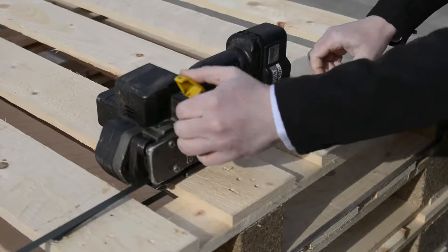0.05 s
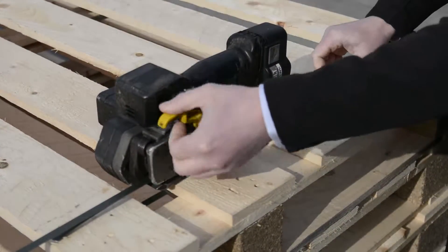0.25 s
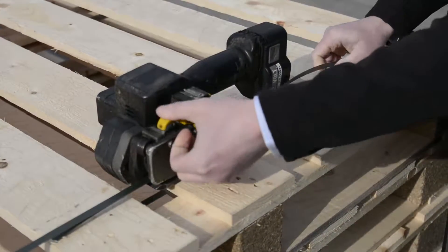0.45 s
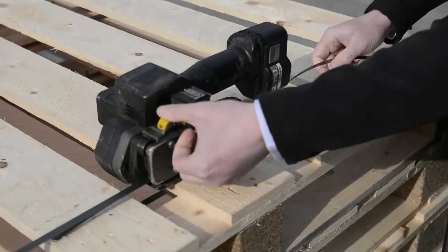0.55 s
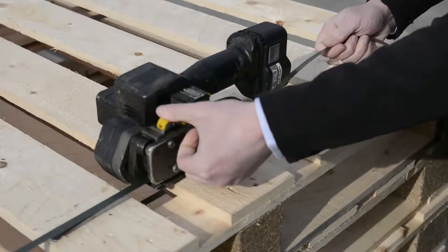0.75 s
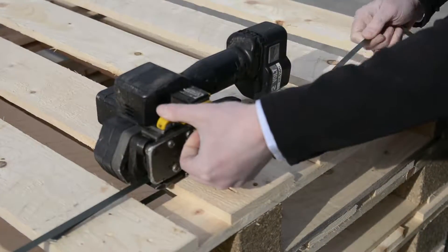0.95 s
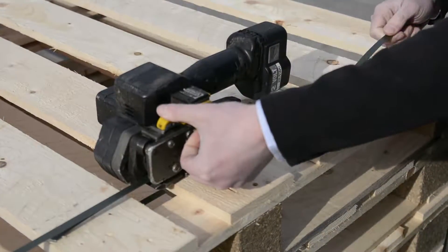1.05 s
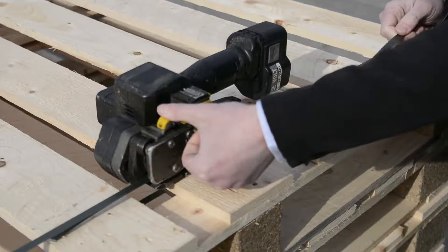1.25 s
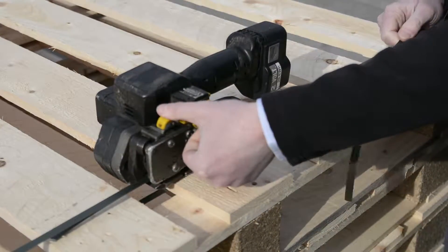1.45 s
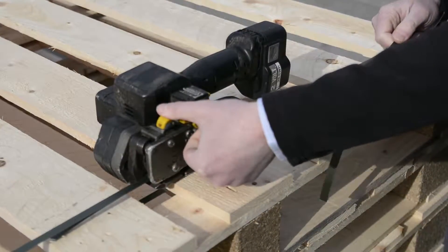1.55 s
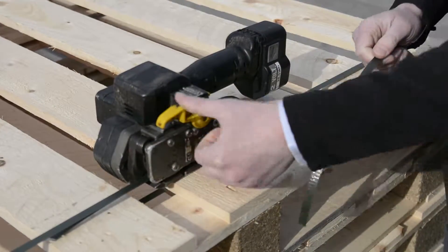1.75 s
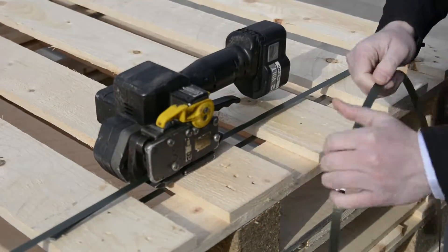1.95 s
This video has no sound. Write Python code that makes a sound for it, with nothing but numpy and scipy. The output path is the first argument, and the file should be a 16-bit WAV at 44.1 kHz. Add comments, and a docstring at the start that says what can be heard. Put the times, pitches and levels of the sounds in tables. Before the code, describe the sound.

A battery strapping tool clicks, spins up and buzzes harshly, welding a plastic strap on a wooden pallet. The buzz eases slightly, then winds down with clicks. It is heard close, outdoors, over a faint distant wash.

```python
"""A battery strapping tool friction-welds a plastic strap on a wooden pallet, outdoors in a yard,
close in front of a narrowly spaced pair of microphones. Its motor spins up and shakes a toothed shoe
that knocks at both ends of each stroke and rasps on the strap; the boards hum underneath. The buzz
eases as the plastic softens, then the motor brakes with a groan. The lever clicks faintly before
and after, over a distant outdoor wash."""
import sys
import numpy as np
from scipy import signal
from scipy.fft import rfft, irfft
from scipy.io import wavfile

SR = 44100
rng = np.random.default_rng(int(sys.argv[2]) if len(sys.argv) > 2 else 0)


def unload_wav(signal):
    """Save mono or channel-first audio to the path in sys.argv[1] as 16-bit WAV at rate SR, clipped to [-1, 1]."""
    wavfile.write(
        sys.argv[1],
        SR,
        np.round(np.clip(np.atleast_2d(signal).T, -1, 1) * 32767).astype(np.int16),
    )


N = 88200

# spectrum of the distant wash (frequency [Hz], relative level [dB])
WASH_SPECTRUM = [(15, -70.5), (25, -34.5), (48, -17), (129, -8.5), (289, -5.5), (331, -13.5), (421, -5.5),
                 (666, -6.5), (848, -4), (1620, -8.5), (2630, -18), (3930, -24), (15500, -35)]
# faint steady tones in the wash (start [s], frequency [Hz], level [dB])
WASH_TONES = [(0, 878, -60.5), (1.9, 1680, -53.5)]
# lever, drive and strap clicks (time [s], knock level [dB], knock pitch [Hz], snap level [dB])
CLICK_EVENTS = [(.0313, -41, 2370, -40.5), (.038, -46, 2600, -63), (.1644, -48, 2010, -71),
                (.1884, -72, 4080, -42), (.2162, -18.5, 1838, -40), (1.3227, -16, 1530, -44),
                (1.3396, -20, 1450, -52), (1.558, -42.5, 3040, -59), (1.5605, -35, 1700, -72),
                (1.9444, -59, 1674, -56)]
# speed of the drive, one turn to each back-and-forth of the shoe (time [s], speed [turns/s])
SHOE_SPEED = [(.213, 32), (.24, 70), (.27, 109), (.3, 136.7), (.336, 149), (.37, 154.9), (.428, 156.8),
              (.478, 162.4), (.528, 165.3), (.632, 167.3), (.72, 167.6), (.804, 166.7), (.912, 164.4),
              (1.1, 163.5), (1.255, 162.8), (1.272, 130), (1.316, 66), (1.356, 27)]
# force on the shoe (time [s], knock level [dB], rasp level [dB], groan level [dB])
SHOE_FORCE = [(.213, -40, -19, -29), (.232, -21, -26.5, -14), (.25, -21.5, -12, -14.5), (.3, -14, -11, -13),
              (.45, -29.5, -10.5, -23.5), (.52, -24.5, -16.5, -31), (.62, -33, -18, -37),
              (.8, -33, -19, -34), (.98, -30.5, -20, -48), (1.15, -33.5, -19, -36.5),
              (1.255, -32, -20, -29.5), (1.285, -29, -22.5, -21.5), (1.32, -28, -24.5, -21.5),
              (1.355, -34, -56, -29)]
# spectrum of the knocks (frequency [Hz], relative level [dB])
KNOCK_SPECTRUM = [(40, -38.5), (300, -35.5), (700, 1), (1000, -6), (1400, -13), (2300, 6.5), (3500, -7.5),
                  (5000, -10.5), (9000, -2.5), (15500, -14)]
# ringing of the housing (frequency [Hz], relative level [dB], t60 [s])
HOUSING_MODES = [(1421, -1, .03), (1549, -6.5, 0.069), (1748, 3.5, 0.024), (2065, -5.5, 0.035),
                 (2462, -12.5, 0.02), (2565, -3.5, 0.027), (3036, -5, 0.031), (3514, -9, 0.027)]
# spectrum of the teeth on the strap (frequency [Hz], relative level [dB])
RASP_SPECTRUM = [(60, -43), (400, -27.5), (1000, -9), (2200, -0.5), (3800, 3.5), (5000, -1.5), (6100, 0.5),
                 (6800, 3.5), (7800, 0), (8900, 5), (9400, -1), (10000, 2.5), (10800, -3), (11600, 2),
                 (12350, -3.5), (13200, 4.5), (14200, -4), (15700, -4.5)]
# swell of the pitched buzz (time [s], level [dB])
BUZZ_LEVEL = [(.23, -47), (.31, -15), (.43, -10.5), (.55, -15.5), (.7, -19.5), (.85, -17.5), (.98, -18.5),
              (1.1, -16.5), (1.24, -15.5), (1.275, -25), (1.33, -51.5)]
# balance of its harmonics in each state of the strap (harmonic [n], cold [dB], soft [dB], molten [dB])
BUZZ_HARMONICS = [(1, -23, -26.5, -25.5), (2, -27, -36.5, -38.5), (3, -12, -24, -27), (4, -9, -30.5, -21),
                  (5, -1, -13, -7), (6, -21.5, -33, -25.5), (7, -4, -15.5, -18), (8, -4, -27, -23.5),
                  (9, -12.5, -9.5, -15.5), (10, -4, -19, -3.5), (11, 1.5, -18, -3.5), (12, 0.5, -8, -20.5),
                  (13, -3, -3, -2), (14, -1, -12, -14), (15, 5.5, -5.5, 0.5), (16, -10.5, -4, -9.5),
                  (17, 0.5, -20.5, -6), (18, -2.5, -11.5, -29.5), (19, -1.5, -18, -10.5), (20, -6, -4, -5),
                  (21, -18.5, -14.5, -7), (22, -1.5, -7, -9), (23, -6.5, -21.5, -28), (24, -15, -14, -22.5),
                  (25, -24, -26, -13.5)]
# difference between the microphones for the close tool (frequency [Hz], side to mid [dB])
TOOL_WIDTH = [(60, -21.5), (450, -21), (800, -47.5), (2000, -59.5), (3300, -42), (5500, -30.5), (9000, -25),
              (14000, -10.5)]
# difference between the microphones for the distant wash (frequency [Hz], side to mid [dB])
WASH_WIDTH = [(130, -28), (1400, -14.5), (7000, 2)]
# reverberation of the yard (frequency [Hz], t60 [s])
YARD_DECAY = [(150, 1), (1000, .6), (3000, 0.82), (8000, .46), (15000, 0.23)]

START_S, STOP_S = .2128, 1.359
SOFTEN_SPAN_S, MELT_SPAN_S = (.44, .495), (.82, .98)
KNOCK_FALL_S, SNAP_FALL_S, CLICK_Q = .0036, .0015, 6.25
RETURN_TURNS, RETURN_DB, STROKE_SPREAD_DB, JITTER_S = .52, 1, 1, .0001
CHATTER_S, CHATTER_DB, RING_DB = .0013, -11, -5.5
GROAN_HOLD, GROAN_FALL_S = .35, .006
RASP_HOLD, RASP_FALL_S, GRIT_SPREAD_DB, TEETH_DB, TEETH_PER_TURN = .43, .0077, .5, -6.5, 14
PALLET_HZ, PALLET_WIDTH_HZ, PALLET_DB = 157, 5, -44
BUZZ_WAVER, BUZZ_LAG_TURNS = .06, .027
WASH_DB, YARD_DB, FIRST_ECHOES_S, SCATTER_S = -50, -24.5, .13, .004
TIME = np.arange(N) / SR


def amp(db):
    """Decibels to gain."""
    return 10 ** (np.asarray(db) / 20)


def unit(x):
    """Scales to rms 1."""
    return x / np.sqrt(np.mean(x ** 2) + 1e-20)


def curve(rows, column=1):
    """One column of a time table, at every sample."""
    rows = np.array(rows)
    return np.interp(TIME, rows[:, 0], rows[:, column])


def read(points, hz):
    """Reads a table on a log-frequency axis."""
    table_hz, value = np.transpose(points)
    return np.interp(np.log(hz + 1), np.log(table_hz), value)


def causal(db):
    """Complex gains of a causal body with these levels, from 0 Hz up."""
    log_gain = np.log(amp(np.r_[db, db[-2:0:-1]]))
    return np.exp(np.conj(signal.hilbert(log_gain)))[:len(db)]


def colour(x, spectrum):
    """Filters through a body with this spectrum, at about equal power."""
    taps = irfft(causal(read(spectrum, np.fft.rfftfreq(4096, 1 / SR))))
    return signal.fftconvolve(x, taps / np.linalg.norm(taps))[:N]


def waver(rate_hz):
    """Random drift of rms 1, mostly slower than the given rate."""
    hz = np.fft.rfftfreq(N, 1 / SR)
    return unit(irfft(rfft(rng.standard_normal(N)) / (1 + (hz / rate_hz) ** 4), N))


def fade(x, fall_s):
    """Gives every impulse an exponential tail."""
    return signal.lfilter([1], [1, -np.exp(-1 / (fall_s * SR))], x)


def crossings(turns):
    """Samples at which a new turn begins."""
    return np.flatnonzero(np.diff(np.ceil(turns)) > 0)


def distant_wash():
    """The outdoors far behind the tool: a gently wavering wash with faint tones in it."""
    wash = amp(WASH_DB + 1.4 * waver(5.1)) * colour(rng.standard_normal(N), WASH_SPECTRUM)
    for start_s, hz, db in WASH_TONES:
        onset = np.clip((TIME - start_s) / .026, 0, 1)
        phase = 2 * np.pi * hz * TIME + .31 * waver(10)
        wash += amp(db) * onset * np.sqrt(2) * np.sin(phase)
    return wash


def clicks():
    """Lever, drive and strap give small plastic clicks: a short dull knock and a bright snap."""
    out, t = np.zeros(N), np.arange(SR // 20) / SR
    for start_s, knock_db, hz, snap_db in CLICK_EVENTS:
        knock_noise, snap_noise = rng.standard_normal((2, len(t)))
        body = unit(signal.lfilter(*signal.iirpeak(hz, CLICK_Q, SR), knock_noise))
        knock = amp(knock_db) * body * np.exp(-t / KNOCK_FALL_S)
        snap = amp(snap_db) * snap_noise * np.exp(-t / SNAP_FALL_S)
        slot = out[round(start_s * SR):][:len(t)]
        slot += (knock + snap)[:len(slot)]
    return out


def strokes(turns):
    """One uneven impulse at each end of the shoe's travel."""
    hits = np.zeros(N)
    for offset, db in ((0, 0), (RETURN_TURNS, RETURN_DB)):
        at = crossings(turns - offset)
        size, late = rng.standard_normal((N // 100, 2))[:len(at)].T
        at += np.round(late * JITTER_S * SR).astype(int)
        hits[at] += amp(db + STROKE_SPREAD_DB * size)
    return hits


def knocks(hits):
    """Each reversal strikes the housing, which chatters and rings."""
    chatter = amp(CHATTER_DB) * fade(hits, CHATTER_S) * rng.standard_normal(N)
    force = unit(hits + chatter) * amp(curve(SHOE_FORCE))
    return colour(force, KNOCK_SPECTRUM) + amp(RING_DB) * housing(force)


def housing(force):
    """Rings the modes of the tool's housing, at about equal power."""
    t = np.arange(SR // 10) / SR
    ring = sum(amp(db - 60 * t / t60) * np.cos(2 * np.pi * hz * t) for hz, db, t60 in HOUSING_MODES)
    return signal.fftconvolve(force, ring / np.linalg.norm(ring))[:N]


def groan(hits, running):
    """The dragging shoe keeps the housing ringing, most while the motor starts and brakes."""
    drag = (GROAN_HOLD * running + fade(hits, GROAN_FALL_S)) * rng.standard_normal(N)
    return housing(unit(drag) * amp(curve(SHOE_FORCE, column=3)))


def rasp(turns, hits, running):
    """Teeth catch at the same places every turn and grind the strap, hardest after each reversal."""
    teeth = np.zeros(N)
    for place, size in zip(rng.random(TEETH_PER_TURN), rng.standard_normal(N // 100)):
        teeth[crossings(turns - place)] += size
    grit = unit(rng.standard_normal(N) * amp(GRIT_SPREAD_DB * waver(3000)))
    grip = RASP_HOLD * running + fade(hits, RASP_FALL_S)
    friction = unit(grip * (grit + amp(TEETH_DB) * unit(teeth)))
    return colour(friction * amp(curve(SHOE_FORCE, column=2)), RASP_SPECTRUM)


def pallet(turns, running):
    """The shaken boards hum, swell as the speed passes their resonance, and ring on after the stop."""
    shake = np.sqrt(2) * np.sin(2 * np.pi * turns) * running
    boards = signal.iirpeak(PALLET_HZ, PALLET_HZ / PALLET_WIDTH_HZ, SR)
    return amp(PALLET_DB) * signal.lfilter(*boards, shake)


def buzz(turns):
    """The shaking that repeats every turn; its timbre shifts as the strap softens, then melts."""
    soften = np.interp(TIME, SOFTEN_SPAN_S, (0, 1))
    melt = np.interp(TIME, MELT_SPAN_S, (0, 1))
    orders = np.arange(len(BUZZ_HARMONICS) + 2)
    harmonics, *states = np.transpose(BUZZ_HARMONICS)
    gains = [causal(np.interp(orders, harmonics, db)) for db in states]
    cold, soft, molten = (gain / np.linalg.norm(gain) for gain in gains)
    out = np.zeros(N)
    for k in orders[1:-1]:
        size = (1 - soften) * abs(cold[k]) + (soften - melt) * abs(soft[k]) + melt * abs(molten[k])
        phase = 2 * np.pi * k * (turns - BUZZ_LAG_TURNS) + np.angle(molten[k])
        out += size * (1 + BUZZ_WAVER * waver(17)) * np.cos(phase)
    return np.sqrt(2) * out * amp(curve(BUZZ_LEVEL))


def board_reflections(x):
    """Quick reflections off the boards, which reach the two microphones differently."""
    t = np.arange(SR // 20) / SR
    taps = rng.standard_normal(len(t)) * np.exp(-t / SCATTER_S)
    return signal.fftconvolve(x, taps / np.linalg.norm(taps))[:N]


def yard(x):
    """Weak scattered echoes from around the yard, dying sooner in the treble."""
    echoes = rng.standard_normal((2, SR)) * (rng.random((2, SR)) < .05)
    hz, t, spectra = signal.stft(echoes, SR, nperseg=256)
    age = t - np.minimum(t, FIRST_ECHOES_S) / 2  # fades half as fast while the first echoes arrive
    decay = amp(-60 * age / read(YARD_DECAY, hz)[:, None])
    tail = signal.istft(spectra * decay, SR, nperseg=256)[1]
    tail = tail + .91 * tail[::-1]  # both microphones hear nearly the same echoes
    return amp(YARD_DB) * signal.fftconvolve(x[None], tail / np.linalg.norm(tail[0]), axes=1)[:, :N]


def microphone_pair(mid, difference, width):
    """Left and right from a common sound and a difference shaped by a width table."""
    side_gain = amp(read(width, np.fft.rfftfreq(N, 1 / SR)))
    side = irfft(rfft(difference) * side_gain, N)
    return np.array([mid + side, mid - side])


def scene():
    """The tool close and centred in front of the pair, the yard around it, the wash far off."""
    running = (TIME > START_S) & (TIME < STOP_S)
    turns = np.cumsum(curve(SHOE_SPEED) * running) / SR
    hits = strokes(turns)
    shoe = buzz(turns) * running + knocks(hits) + groan(hits, running) + rasp(turns, hits, running)
    tool = shoe + pallet(turns, running) + clicks()
    close = microphone_pair(tool, board_reflections(tool), TOOL_WIDTH)
    return close + yard(tool) + microphone_pair(distant_wash(), distant_wash(), WASH_WIDTH)


def record(dry):
    """The recorder overloads softly on the loudest peaks and cuts the top treble."""
    squashed = dry / (1 + dry ** 4) ** (1 / 4)
    lowpass = signal.firwin(511, 15800, window=("kaiser", 8), fs=SR)
    return signal.oaconvolve(squashed, lowpass[None], "same")


dry = scene()
out = record(dry)
unload_wav(out)
```